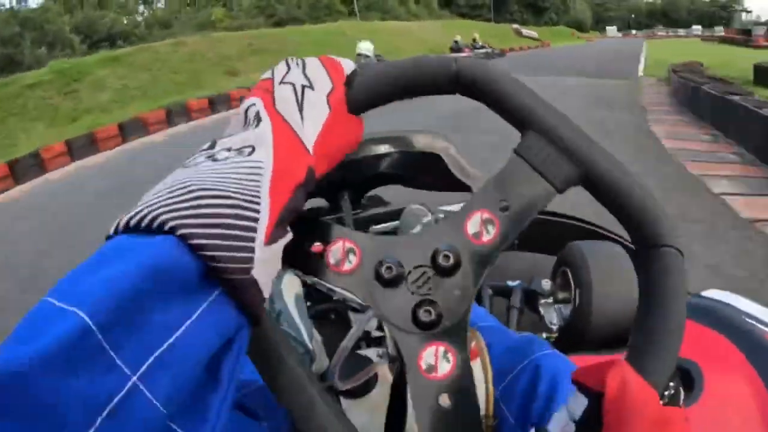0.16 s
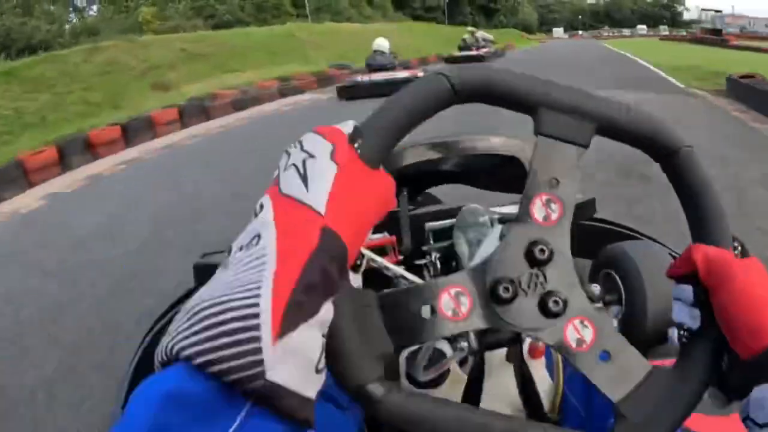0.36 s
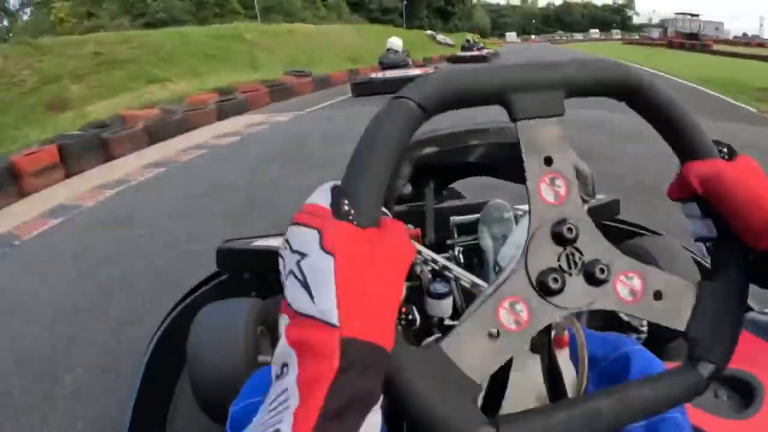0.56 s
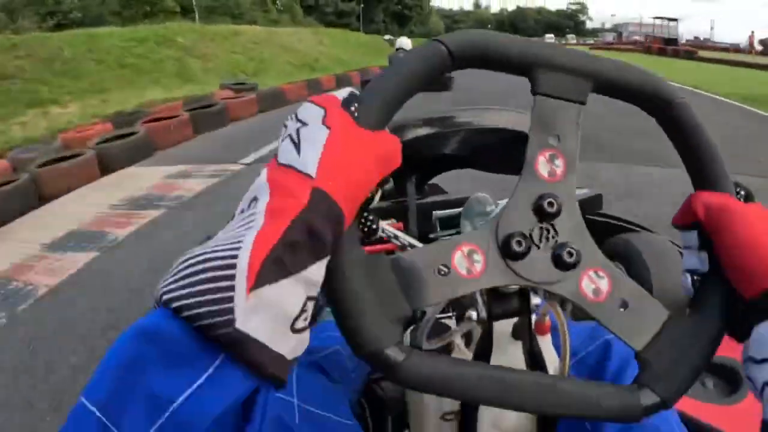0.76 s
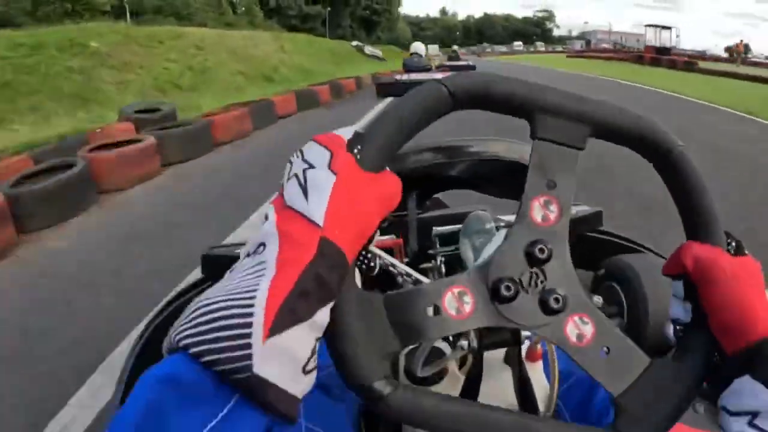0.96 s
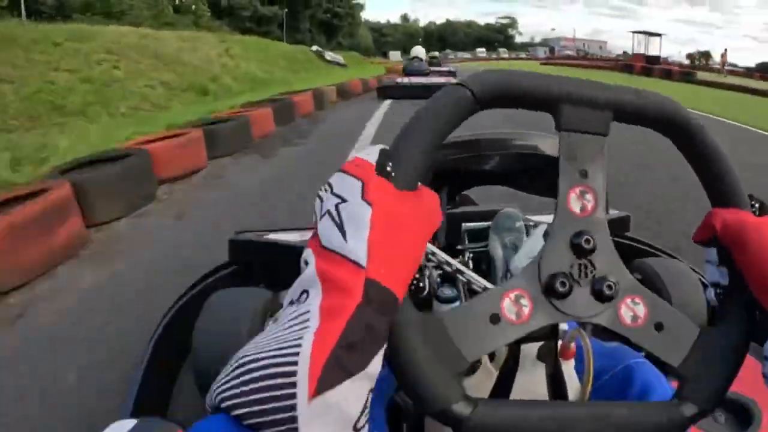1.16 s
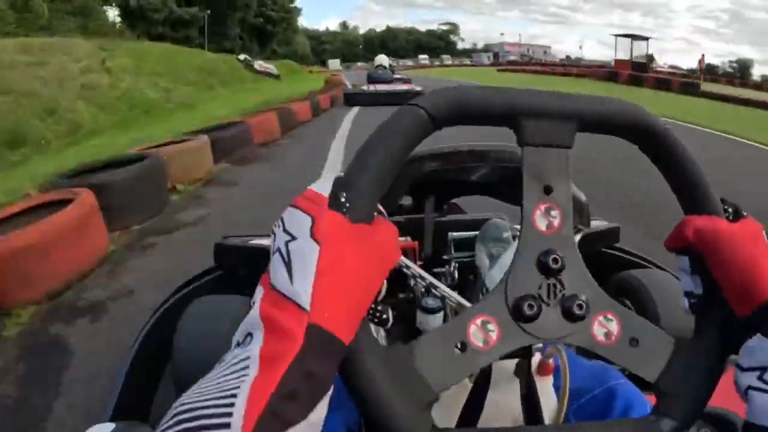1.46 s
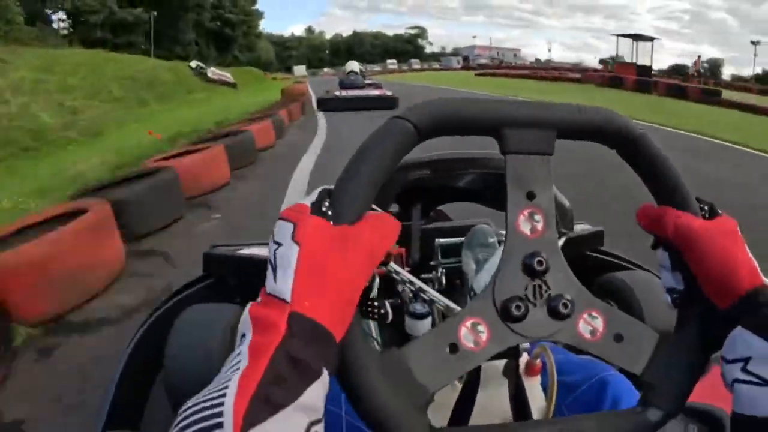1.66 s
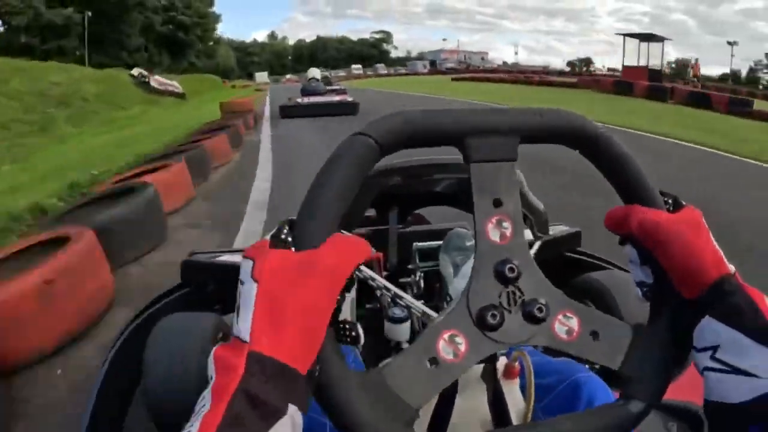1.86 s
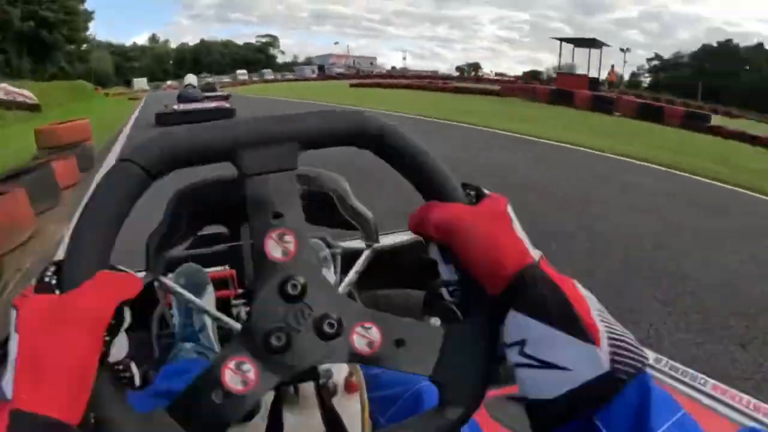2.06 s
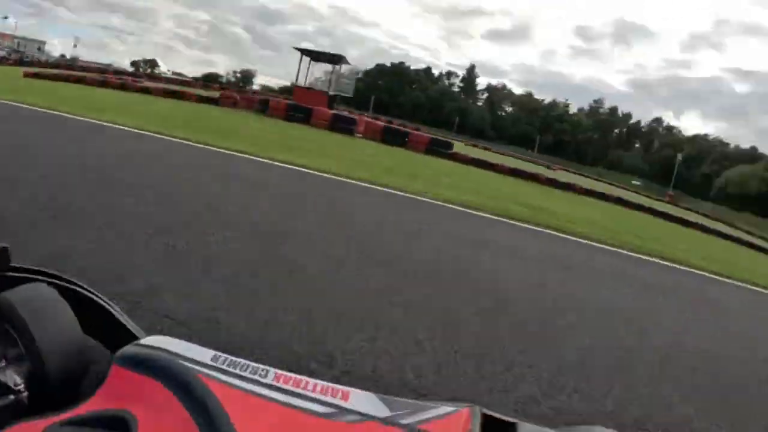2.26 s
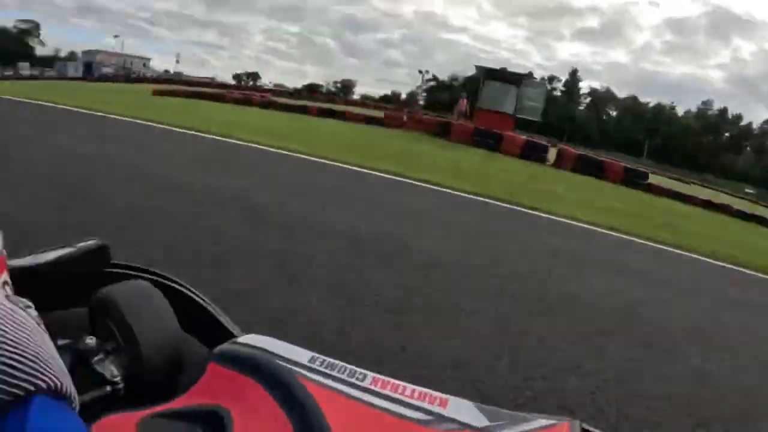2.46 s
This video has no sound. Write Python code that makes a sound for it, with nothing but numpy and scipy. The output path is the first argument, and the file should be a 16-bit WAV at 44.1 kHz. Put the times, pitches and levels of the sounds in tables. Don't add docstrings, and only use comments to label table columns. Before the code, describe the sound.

A small single-cylinder kart engine drones at racing speed, heard from the seat, with chain whirr and wind.

```python
import sys
import numpy as np
from scipy import signal
from scipy.io import wavfile

SR = 44100
rng = np.random.default_rng(int(sys.argv[2]) if len(sys.argv) > 2 else 0)


def makeup_ratio(level_db):
    decades = np.asarray(level_db, float) / 20
    return 10 ** decades


def dump_mix(stems):
    frames = np.atleast_2d(stems).T
    limited = np.clip(frames, -1, 1)
    pcm = np.round(limited * 32767).astype(np.int16)
    wavfile.write(sys.argv[1], SR, pcm)


N = 114660

# time in [s], firing rate in [Hz].
FIRING_RATE_HZ = [(0, 30.495), (.2, 31.832), (.4, 32.508), (.6, 31.308), (.8, 30.553), (1, 30.67),
                  (1.2, 31.331), (1.4, 31.095), (1.6, 31.348), (1.8, 31.532), (2, 32.102), (2.2, 32.636),
                  (2.4, 33.241), (2.6, 33.492)]
CRANK_SURGE = [(-2, .014), (5, .016), (12.5, .014), (17, .026), (22.3, .02), (27.5, .015), (32.5, .015),
               (36.5, .012), (40.5, .011), (46, .018), (51, .004), (56, .002), (62, .002), (69, .005),
               (75, .004), (80, .004), (86, .003)]
# time in [s], level in [dB].
THROTTLE_DB = [
    (0, -2.),
    (.25, -1.),
    (.6, -.5),
    (1.2, -.5),
    (1.7, .3),
    (2.2, .3),
    (2.35, -1.2),
    (2.6, -1.2),
]
# frequency in [Hz], level in [dB], T60 in [s].
SILENCER_MODES = [(135, -5, .015), (378, -5, .032), (478, -5.5, .03), (620, -16, .015)]
# frequency in [Hz], level in [dB], T60 in [s].
AIRBOX_MODES = [(190, -5, .04), (130, -3, .022), (226, -3.5, .03)]
# multiple of firing rate [ratio], level in [dB], crest position in [cycles].
FRAME_ORDERS = [(6, -44., .008), (12, -48., -.02), (15, -51., -.025)]
# time in [s], level in [dB].
CHAIN_DB = [(0, -43.5), (.3, -43.5), (.6, -44.5), (.95, -44), (1.4, -41), (1.8, -42), (2.1, -47.5),
            (2.3, -38.5), (2.6, -40)]
# frequency in [Hz], width in [Hz], level in [dB].
GUARD_MODES = [(932, 315, 8), (833, 194, 6), (1274, 46, -8)]
# frequency in [Hz], width in [Hz], level in [dB].
BELL_MODES = [(1730, 110, 2.5), (7660, 700, -17), (4830, 140, -13.5)]
# time in [s], level in [dB].
BELL_DB = [(0, -55), (.45, -61), (.6, -60), (2., -56), (2.15, -57), (2.6, -62)]
# time in [s], level in [dB].
SHAKE_DB = [(0, -47), (.05, -54), (.1, -50), (.18, -49), (.21, -55), (.28, -50.5), (.38, -55.5), (.48, -52),
            (.55, -58.5), (.64, -53), (.72, -56.5), (1.2, -57), (1.3, -58), (2.33, -57.5), (2.39, -55.5),
            (2.49, -59), (2.545, -52), (2.6, -57)]
# frequency in [Hz], density in [dB per Hz].
SHAKE_SPECTRUM = [(700, 11.5), (1100, -0.5), (1700, 3), (2400, -18), (3900, -15.5), (6700, -26.5),
                  (8200, -26), (14000, -57.5)]
# frequency in [Hz], density in [dB per Hz].
SCRUB_SPECTRUM = [(800, 4.5), (1400, 1.5), (2200, 1), (3000, -4), (3700, -6.5), (4600, -16.5), (7000, -17),
                  (9500, -46.5)]
# frequency in [Hz], density in [dB per Hz].
ROAD_SPECTRUM = [(60, -35.5), (130, -1.5), (210, 5), (300, -4), (480, -1.5), (680, -12.5), (1100, -19.5),
                 (2000, -32.5)]
# time in [s], level in [dB].
GUST_DB = [(0, -28), (.05, -37.5), (.12, -38), (.55, -37), (1.06, -38.5), (1.17, -45.5), (1.3, -33),
           (1.4, -42), (1.49, -35), (1.57, -39), (1.7, -33.5), (1.98, -38.5), (2.1, -37), (2.6, -36)]
# frequency in [Hz], density in [dB per Hz].
WIND_SPECTRUM = [(15, -7), (30, -2.5), (48, -3.5), (100, -2.5), (200, -19)]
# time in [s], peak level in [dB].
KNOCK_EVENTS = [(.092, -50), (0.107, -49.5), (0.144, -50), (0.185, -47.5), (0.219, -49.5), (0.281, -48),
                (.428, -51), (0.479, -45), (.492, -52.5), (2.059, -51), (2.118, -53), (2.171, -50),
                (2.327, -54), (2.37, -47), (2.384, -49.5), (2.391, -47), (2.399, -42.5), (2.415, -49),
                (2.434, -42.5), (2.445, -50), (2.451, -45), (2.485, -50), (2.509, -47.5), (2.531, -49),
                (2.546, -47.5), (2.553, -52.5), (2.572, -51)]
# frequency in [Hz], density in [dB per Hz].
BODYWORK_SPECTRUM = [(800, 2), (1400, 0), (2200, -1), (3100, -1), (4000, -6), (5500, -14), (8000, -22),
                     (13000, -46)]

FIRST_CYCLE = .112
BLOW_AT_CYCLES, GULP_AT_CYCLES = -.042, .054
BLOW_DB, GULP_DB, PUFF_DB = -27.5, -25.5, -50.5
JITTER_S, UNEVEN_DB = .00007, .8
CRANK_DB, CRANK_LEAD_RAD, CRANK_WOBBLE_DB = -41.5, 1, -0.5
TEETH_PER_CYCLE, TOOTH_SPREAD_DB = 28, 4.
SLACK_TEETH, RUNOUT_TEETH = .08, .13
ROAD_DB, THROB_DB = -35.3, .8
KNOCK_T60_S, KNOCK_RISE_S = .024, .0005


def rms_one(x):
    return x / np.sqrt(np.mean(x ** 2) + 1e-20)


def in_time(rows):
    return np.interp(np.arange(N) / SR, *np.transpose(rows))


def drift(rate_hz):
    r = np.exp(-80 * np.pi * rate_hz / SR)
    white = rng.standard_normal(N // 40 + 2002)
    slow = signal.lfilter([1], [1, -2 * r, r * r], white)[2000:]
    return np.interp(np.arange(N) / 40, np.arange(len(slow)), rms_one(slow))


def ring(clicks, hz, t60_s):
    r, w = makeup_ratio(-60 / (t60_s * SR)), 2 * np.pi * hz / SR
    return signal.lfilter([0, np.sin(w)], [1, -2 * r * np.cos(w), r * r], clicks + 1e-18)


def double_resonance(x, hz, width_hz, second_width_hz):
    for width in (width_hz, second_width_hz):
        r = np.exp(-np.pi * width / SR)
        poles = [1, -2 * r * np.cos(2 * np.pi * hz / SR), r * r]
        x = signal.lfilter([(1 - r * r) / 2, 0, (r * r - 1) / 2], poles, x)
    return x


def banded(spectrum, own_db, shared_db, rate_hz):
    hz, db = np.transpose(spectrum)
    edges_hz = hz[0] * 2 ** np.arange(0, np.log2(hz[-1] / hz[0]) + .2, 1 / 3)
    together = drift(rate_hz)
    white = rng.standard_normal((2, N + SR))
    out = 0
    for k, (low, high) in enumerate(zip(edges_hz, edges_hz[1:])):
        sos = signal.butter(2, [low, high], "band", fs=SR, output="sos")
        band = signal.sosfilt(sos, white[k % 2])[SR:]
        level_db = np.interp(np.log(low * high) / 2, np.log(hz), db)
        out = out + makeup_ratio(level_db + shared_db * together + own_db * drift(rate_hz)) * band
    return rms_one(out)


def crank_cycles():
    cycles = FIRST_CYCLE + np.cumsum(in_time(FIRING_RATE_HZ)) / SR
    at, lag = np.transpose(CRANK_SURGE)
    swings = np.interp(cycles, at, np.arange(len(at)))
    return cycles - np.interp(cycles, at, lag) * np.cos(2 * np.pi * swings)


def gas_pulses(cycles, at_cycles, chance):
    s = np.interp(np.arange(len(chance)) + at_cycles, cycles, np.arange(N) / SR, left=-1, right=-1)
    i = ((s + JITTER_S * chance[:, 0]) * SR).astype(int)
    ok = (i >= 0) & (i < N) & (s > 0)
    out = np.zeros(N)
    out[i[ok]] = makeup_ratio(UNEVEN_DB * chance[ok, 1])
    return signal.sosfilt(signal.butter(2, 1500, fs=SR, output="sos"), out)


def engine(cycles):
    chance = rng.standard_normal((90, 3))
    blow = gas_pulses(cycles, BLOW_AT_CYCLES, chance[:, [0, 1]])
    gulp = gas_pulses(cycles, GULP_AT_CYCLES, chance[:, [0, 2]])
    exhaust = makeup_ratio(BLOW_DB) * sum(makeup_ratio(db) * ring(blow, hz, t60) for hz, db, t60 in SILENCER_MODES)
    intake = makeup_ratio(GULP_DB) * sum(makeup_ratio(db) * ring(gulp, hz, t60) for hz, db, t60 in AIRBOX_MODES)
    gate = np.exp(2.6 * np.cos(2 * np.pi * (cycles - .01)))
    gas = double_resonance(rng.standard_normal(N) * gate, 430, 300, 300)
    pulses = exhaust - intake + makeup_ratio(PUFF_DB) * rms_one(gas)
    wobble = makeup_ratio(CRANK_WOBBLE_DB * drift(11.0))
    crank = wobble * np.cos(4 * np.pi * cycles + CRANK_LEAD_RAD)
    return makeup_ratio(in_time(THROTTLE_DB)) * pulses + makeup_ratio(CRANK_DB) * np.sqrt(2) * crank


def frame_hum(cycles):
    slip_rad, swell_db = .2, 1.2
    out = 0
    for order, db, at in FRAME_ORDERS:
        phase = 2 * np.pi * order * (cycles - at) + slip_rad * drift(1.7)
        out = out + makeup_ratio(db + swell_db * drift(5.1)) * np.sqrt(2) * np.cos(phase)
    return out


def rung_by(hits, modes):
    out = 0
    for hz, width, db in modes:
        out = out + makeup_ratio(db) * rms_one(double_resonance(hits, hz, width, 0.84 * width))
    return rms_one(out)


def chain(cycles):
    teeth = TEETH_PER_CYCLE * cycles + SLACK_TEETH * drift(60.) + .06 * drift(5.5)
    teeth += RUNOUT_TEETH * np.sin(4 * np.pi * cycles) - .07 * np.sin(2 * np.pi * cycles)
    struck = np.diff(np.floor(teeth), prepend=np.floor(teeth[0])) > 0
    hit_db = TOOTH_SPREAD_DB * np.tanh(rng.standard_normal(N)) + 3.2 * np.tanh(drift(45.0))
    pull_db = 1.4 * np.cos(4 * np.pi * cycles) - 2.5 * np.cos(2 * np.pi * (cycles - .15))
    hits = struck * makeup_ratio(hit_db + pull_db)
    guard = makeup_ratio(in_time(CHAIN_DB)) * rung_by(hits, GUARD_MODES)
    bell = makeup_ratio(in_time(BELL_DB)) * rung_by(hits, BELL_MODES)
    return guard + bell


def frame_shake():
    return makeup_ratio(-47.5 + 0.15 * (in_time(SHAKE_DB) + 59.5)) * banded(SHAKE_SPECTRUM, 3.05, 0.83, 17.0)


def tyre_scrub():
    return makeup_ratio(in_time(SHAKE_DB) + 4.0) * banded(SCRUB_SPECTRUM, 1.8, 1.0, 24.0)


def tyre_roar(cycles):
    throb_db = THROB_DB * np.cos(2 * np.pi * (cycles - GULP_AT_CYCLES))
    return makeup_ratio(ROAD_DB + throb_db) * banded(ROAD_SPECTRUM, 1.4, 0.11, 25.0)


def wind():
    return makeup_ratio(in_time(GUST_DB) + 2.0) * banded(WIND_SPECTRUM, 1.5, 1.2, 6.)


def knocks():
    strike = np.zeros(N)
    for s, db in KNOCK_EVENTS:
        strike[int(s * SR)] = makeup_ratio(db + 4.5)
    rise = np.exp(-1 / (KNOCK_RISE_S * SR))
    fall = makeup_ratio(-60 / (KNOCK_T60_S * SR))
    envelope = signal.lfilter([1 - rise], np.convolve([1, -rise], [1, -fall]), strike + 1e-18)
    return envelope * banded(BODYWORK_SPECTRUM, 0.092, .1, 9.)


def scene():
    cycles = crank_cycles()
    driven = engine(cycles) + frame_hum(cycles) + chain(cycles)
    track = frame_shake() + tyre_scrub() + tyre_roar(cycles)
    return (driven + track + wind() + knocks())[None]


def top_cut(x):
    return signal.sosfilt(signal.butter(12, 13800, fs=SR, output="sos"), x)


def record(dry):
    to_end_samples = np.minimum(np.arange(N), np.arange(N)[::-1])
    fade = np.minimum(.4 + to_end_samples / (.004 * SR), 1)
    ceiling = .16
    return top_cut(ceiling * np.tanh(fade * dry / ceiling))


dry = scene()
out = record(dry)
dump_mix(out)
```